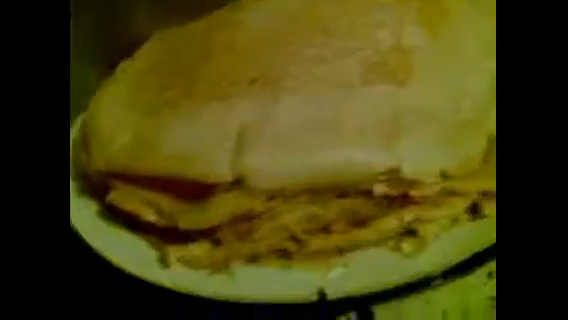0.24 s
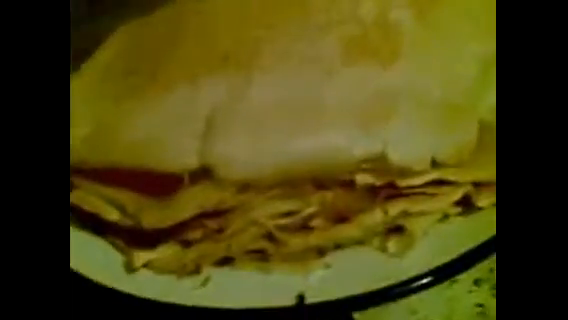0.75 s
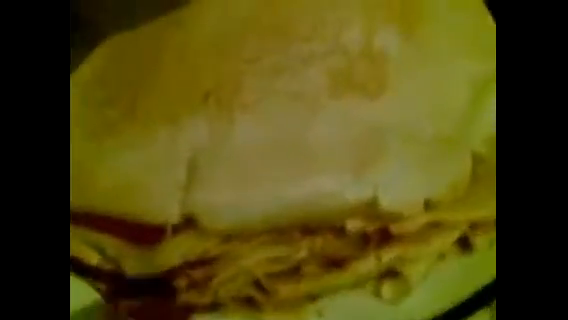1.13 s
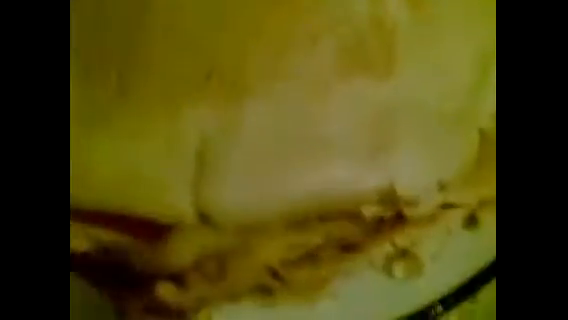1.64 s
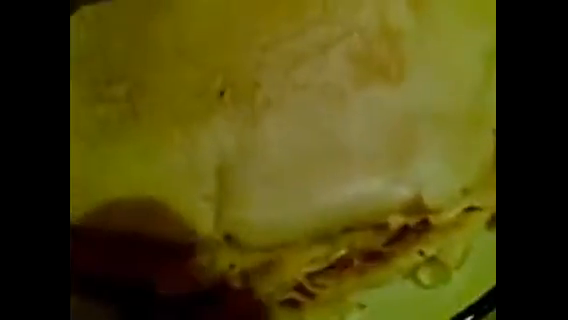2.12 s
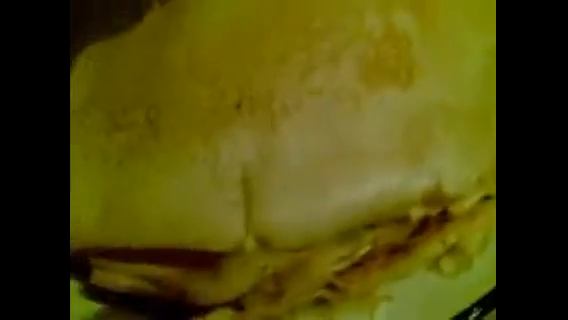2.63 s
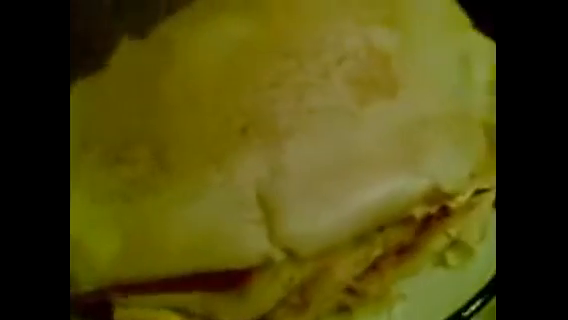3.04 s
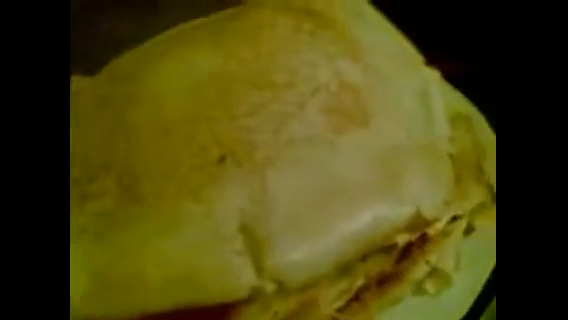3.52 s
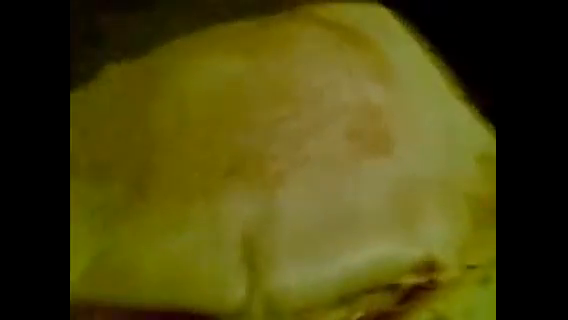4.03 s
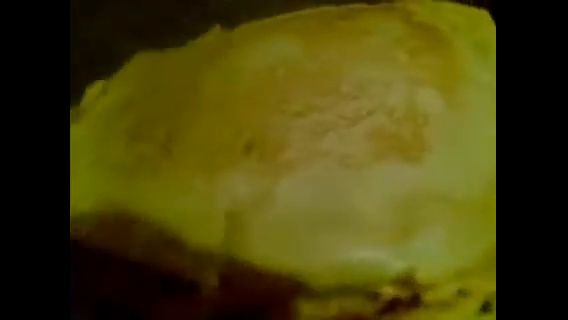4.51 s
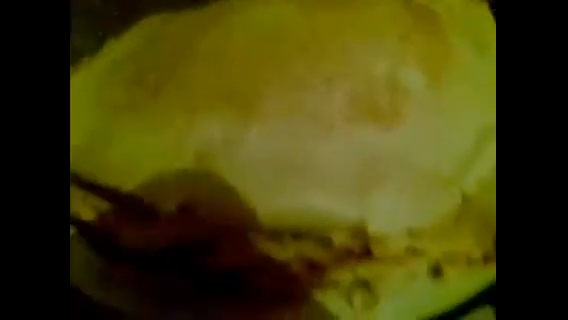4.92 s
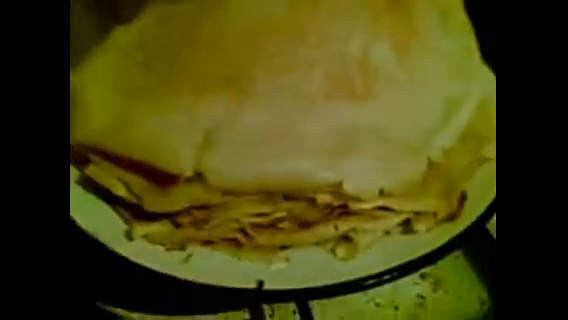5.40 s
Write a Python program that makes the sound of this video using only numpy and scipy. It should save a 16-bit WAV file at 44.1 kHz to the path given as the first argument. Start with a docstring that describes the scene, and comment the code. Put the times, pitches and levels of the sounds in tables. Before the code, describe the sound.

A very brief soft ring over a low drone cuts to dead silence, then frying starts abruptly: broad gas hiss, fine bright sizzle and low fluttering flame rumble. A utensil gives a strong double scrape that rings the pan, then faint ticks, then more scrapes near the end. Close microphone above the pan in a home kitchen, drifting across it and back.

```python
"""A brief soft ring over a low drone is heard first, then a moment of dead silence. A filled flatbread then
fries in a pan over a gas burner, heard from close above in a home kitchen. The flame is low coloured noise;
steam from the pan is broad hiss plus a few hollow resonances of noise. Fat sizzles as noise mixed with dense
clicks, and steady sines hum beneath. A utensil scrapes in short strokes: swells of clicks that excite the
decaying modes of the pan."""
import sys
import numpy as np
from scipy import signal
from scipy.fft import rfft, irfft
from scipy.io import wavfile

SR = 44100
rng = np.random.default_rng(int(sys.argv[2]) if len(sys.argv) > 2 else 0)


def output_pcm(signal):
    """Save a mono or channel-first signal as 16-bit PCM at the path in sys.argv[1].

    Samples are clipped to [-1, 1] before scaling.
    """
    pcm = np.clip(np.atleast_2d(signal).T, -1, 1) * 32767
    wavfile.write(sys.argv[1], SR, np.round(pcm).astype(np.int16))


N = 249606
TIME = np.arange(N) / SR  # s
FREQ = np.maximum(np.arange(N // 2 + 1) * SR / N, 1)  # Hz, kept above zero for the logarithm

# partials of the opening ring: [f/Hz, relative level/dB]
RING_PARTIALS = [(625, -48), (1163, -72.5), (1507, -71)]
# spectrum of the low drone under the ring: [f/Hz, relative level per Hz/dB]
DRONE_SPECTRUM = [(30, -23), (125, 2.5), (260, -10), (500, -22), (1600, -25.5), (2200, -37.5), (6000, -44),
                  (14000, -57)]
# dead silence: [start t/s, end t/s]
SILENCE_SPAN = (.042, .269)
# drift of the microphone across the pan and back: [t/s, place from 0 at the near rim to 1 at the far side]
MICROPHONE_PATH = [(0.28, 0.16), (1.0, 0.2), (1.6, 0.39), (2.4, 0.73), (3.1, 0.89), (3.8, 1.0), (4.1, 0.88),
                   (4.4, 0.6), (4.85, 0.43), (5.1, 0.11), (5.65, 0.037)]
# spectrum of the broad hiss: [f/Hz, relative level per Hz/dB]
HISS_SPECTRUM = [(400, -17.5), (900, -2.5), (1250, -5), (1650, 0), (2300, -1.5), (2850, -5.5), (4100, 2),
                 (5700, 2), (6350, 1.6), (6850, 1.5), (7900, 4.5), (10000, -0.5), (13500, -4.5),
                 (15000, -4)]
# the one swell of the broad hiss: [peak t/s, rise/s, fall/s, gain/dB]
HISS_RISE_AND_FALL = (2.9, 0.65, .55, 1.9)
# hollow resonances of the steam's hiss, each beaming at one place: # [f/Hz, width/Hz, level in the beam/dB,
# place 0-1, reach 0-1, drop outside the beam/dB]
HOLLOW_RESONANCES = [(1930, 225, -50, 0.97, .06, 5.5), (3607, 730, -44.5, 0.01, .15, 5.5),
                     (4884, 630, -48.5, 0.68, .2, 3.5), (7310, 390, -45.5, 0.95, 0.18, 8.5),
                     (8940, 590, -45, 0.4, 0.22, 10), (12780, 670, -50.5, 0.74, 0.16, 3.5)]
# spectral peaks of the fine sizzle: [f/Hz, width/Hz, relative level/dB]
SIZZLE_PEAKS = [(10110, 2100, -0.5), (11460, 620, -2), (12600, 730, -7.5), (14850, 700, -15)]
# flares of the sizzle: [peak t/s, rise/s, fall/s, gain/dB]
SIZZLE_FLARES = [(1.75, .42, .7, 5.5), (4.11, 0.062, .22, 4.2), (4.78, .17, .18, 4.5)]
# spectrum of the flame: [f/Hz, relative level per Hz/dB]
FLAME_SPECTRUM = [(20, -14), (40, -1.5), (65, 1.5), (105, 1), (150, -6), (198, 2), (222, -3.5), (250, 1.5),
                  (310, -2), (360, -8.5), (490, -12), (660, -6), (900, -11.5), (1500, -21.5)]
# steady hum: [f/Hz, rms level/dB]
HUM_TONES = [(59.2, -62.5), (249, -60), (392, -68), (684, -71.5)]
# utensil strokes: [peak t/s, rise/s, fall/s, level/dB, gritty edge relative to the stroke/dB]
UTENSIL_STROKES = [(1.346, 0.022, 0.014, -36.5, -3), (1.367, 0.013, 0.021, -32, -1),
                   (1.462, .014, 0.0076, -41.5, -6), (2.397, .005, 0.0078, -54.5, 14),
                   (2.863, .004, 0.032, -55, 12), (3.0, 0.012, 0.0098, -53, -2),
                   (4.009, 0.015, 0.011, -43.5, 5.5), (4.165, 0.013, 0.012, -50, -6),
                   (4.245, .025, 0.018, -45, -5), (4.874, 0.019, 0.011, -45.5, 1),
                   (4.95, 0.028, 0.023, -39, -3.5), (4.996, .014, 0.021, -45.5, 7)]
# sharp catches of the utensil's edge: [t/s, relative level/dB]
EDGE_CATCHES = [(1.367, -27), (2.863, -17), (4.01, -27)]
# spectra of a stroke's rub and of its gritty edge: [f/Hz, relative level per Hz/dB]
RUB_SPECTRUM = [(200, -27), (600, -13), (950, -13.5), (1250, -4.5), (1520, 1), (1850, -1), (2300, -13),
                (3600, -5), (5500, -31), (9000, -50)]
GRIT_SPECTRUM = [(300, -10), (900, -6), (2200, -1.5), (3400, -2), (5000, -2), (5700, -12.5), (7500, -10),
                 (12000, -24)]
# modes of the pan: [f/Hz, time to decay by 60 dB/s, relative level/dB]
PAN_MODES = [(1135, 0.33, -10), (1315, 0.23, 2), (1306, .25, -1), (1490, 0.25, 8.5), (1535, 0.054, 2),
             (1670, .15, -5), (1750, 0.15, -6), (1800, 0.22, 4), (2860, 0.75, -4.5), (3140, 0.18, 4),
             (3785, .12, -25), (4240, 0.083, 3)]

HISS_DB = -42.9  # outside its swell, once the entry has settled
SIZZLE_DB = -46  # between flares, once the entry has settled
FLAME_DB, FLAME_RISE_DB = -46, 1.76  # level at the near rim; gain towards the far side
ENTRY_DB, ENTRY_S = -2.5, 0.12  # initial gain of hiss and sizzle; time constant of its settling
RING_SHARE_DB = -7.2  # how strongly a stroke rings the pan
TOP_HZ = 15000  # upper edge of the recorder's passband


def undb(db):
    """Amplitude gain is the exponential of a level in decibels."""
    return 10 ** (np.asarray(db) / 20)


def unit(x):
    """Normalisation sets the root mean square to 1."""
    return x / np.sqrt(np.mean(x ** 2))


def shape(x, gain):
    """Linear filtering multiplies the spectrum by a gain; white noise keeps its power."""
    return irfft(rfft(x) * unit(gain), N)


def colour(points):
    """A spectral envelope is interpolated in decibels over logarithmic frequency."""
    hz, db = np.transpose(points)
    return undb(np.interp(np.log(FREQ), np.log(hz), db))


def hump(hz, width):
    """A steep resonance has gain 1 at its centre and falls with relative detuning."""
    detuning = (FREQ / hz - hz / FREQ) * hz / width
    return 1 / (1 + detuning ** 2)


def noise():
    """White noise is a sequence of independent Gaussian samples."""
    return rng.standard_normal(N)


def walk(rate):
    """Low-passed noise fluctuates slowly, with a spread of 1 and a corner at rate in Hz."""
    return shape(noise(), 1 / (1 + (FREQ / rate) ** 4))


def grains(rate, spread_db):
    """Random impulses, rate per second, have many small sizes and a few large; rms 1."""
    size = undb(spread_db * np.minimum(rng.exponential(size=N), 5))
    strikes = rng.random(N) < rate / SR
    return unit(strikes * size * np.sign(noise()))


def tones(table, waver_hz):
    """Sines of wandering frequency superpose; each phase is the integral of its frequency."""
    total = np.zeros(N)
    for hz, db in table:
        phase = 2 * np.pi * np.cumsum(hz + waver_hz * walk(6.65)) / SR
        total += np.sqrt(2) * undb(db) * np.sin(phase)  # the root of 2 makes the level rms
    return total


def swell(s, rise, fall):
    """A rounded envelope grows to 1 at time s and decays, each at its own pace."""
    pace = np.where(TIME < s, rise, fall)
    return np.exp(-.5 * (np.abs(TIME - s) / pace) ** 1.77)


def beam(place, centre, reach, drop_db):
    """Directivity makes a source loudest at one place and lower by a fixed drop far from it."""
    closeness = np.exp(-((place - centre) / reach) ** 2)
    return undb(drop_db * (closeness - 1))


def opening():
    """Exponentially damped partials ring over a drone of coloured noise and one tone."""
    attack = np.clip((TIME - .005) / 0.0021, 0, 1)
    envelope = attack * np.exp(-TIME / 0.035)
    ring = undb(6.5) * envelope * tones(RING_PARTIALS, waver_hz=1)
    drone = undb(-50.0) * shape(noise(), colour(DRONE_SPECTRUM)) + tones([(121, -53.0)], waver_hz=2)
    return ring + drone


def steam(place):
    """Steam rising from the pan makes broadband hiss, with narrow resonant bands that each sound loudest at one
    place."""
    s, rise, fall, gain_db = HISS_RISE_AND_FALL
    hiss_db = HISS_DB + gain_db * swell(s, rise, fall)
    out = shape(noise(), colour(HISS_SPECTRUM)) * undb(hiss_db)
    for hz, width, db, centre, reach, drop_db in HOLLOW_RESONANCES:
        resonance = hump(hz, width) + 0.36 * hump(hz, width / 3)  # a whistly core on a wider skirt
        flutter = undb(db + 1.15 * walk(14))
        out += shape(noise(), resonance) * flutter * beam(place, centre, reach, drop_db)
    return out


def sizzle():
    """Tiny bubbles burst under the bread so densely that their impulses merge with the steam's noise."""
    bursts = unit(noise() + undb(-7) * grains(rate=2100, spread_db=2.5))
    power = sum((undb(db) * hump(hz, width)) ** 2 for hz, width, db in SIZZLE_PEAKS)
    flares_db = sum(db * swell(s, rise, fall) for s, rise, fall, db in SIZZLE_FLARES)
    flutter_db = 0.88 * walk(16)
    return shape(bursts, np.sqrt(power)) * undb(SIZZLE_DB + flares_db + flutter_db)


def flame(place):
    """Turbulent combustion radiates a low rumble whose level flutters."""
    rumble = shape(noise(), colour(FLAME_SPECTRUM)) * undb(1.1 * walk(15))
    return rumble * undb(FLAME_DB + FLAME_RISE_DB * place)


def hum():
    """Sustained tones hold their level while their frequencies wander slightly."""
    return tones(HUM_TONES, waver_hz=2.0)


def utensil():
    """Stick-slip friction makes each stroke a swell of dense clicks that rub, grate and ring the pan."""
    pressure, edge = np.zeros((2, N))
    for s, rise, fall, db, grit_db in UTENSIL_STROKES:
        push = undb(db) * swell(s, rise, fall)
        pressure = np.hypot(pressure, push)  # overlapping strokes add in power
        edge = np.hypot(edge, push * undb(grit_db))
    slips = pressure * grains(rate=9000, spread_db=0.2)
    grit = edge * grains(rate=7600, spread_db=1.5)
    for s, db in EDGE_CATCHES:
        grit[int(s * SR)] += undb(db)
    rub = shape(slips, colour(RUB_SPECTRUM))
    grating = undb(0.5) * shape(grit, colour(GRIT_SPECTRUM))
    return rub + grating + undb(RING_SHARE_DB) * pan_ring(slips)


def pan_ring(force):
    """Force convolved with the impulse response rings the pan's modes, damped by the bread."""
    t = TIME[:SR // 2]
    response = np.zeros(len(t))
    for hz, t60, db in PAN_MODES:
        decay = np.exp(-np.log(1000) * t / t60)
        response += undb(db) / t60 * np.sin(2 * np.pi * hz * t) * decay
    return signal.fftconvolve(force, response / np.linalg.norm(response))[:N]


def scene():
    """Superposition: the opening, silence, then the stove under a drifting microphone; equal channels."""
    start, end = SILENCE_SPAN
    place = np.interp(TIME, *np.transpose(MICROPHONE_PATH))
    # hiss and sizzle come in a little soft and settle
    entry = undb(ENTRY_DB * np.exp(-np.maximum(TIME - end, 0) / ENTRY_S))
    frying = entry * (steam(place) + sizzle())
    stove = frying + flame(place) + hum()
    mono = opening() * (TIME < start) + (stove + utensil()) * (TIME > end)
    return np.array([mono, mono])


def record(dry):
    """An elliptic low-pass filter gives the recorder its steep upper cutoff."""
    lowpass = signal.ellip(12, .1, 80, TOP_HZ, fs=SR, output="sos")  # ripple and stopband in dB
    return signal.sosfilt(lowpass, dry)


dry = scene()
out = record(dry)
output_pcm(out)
```